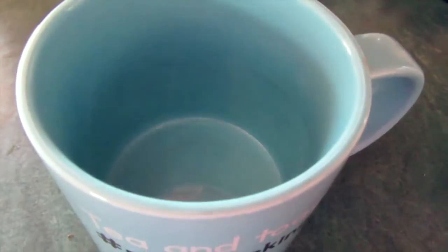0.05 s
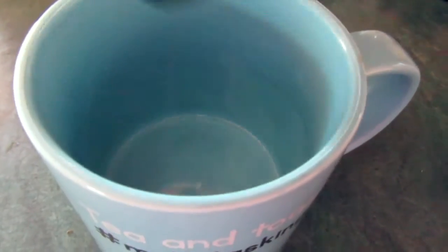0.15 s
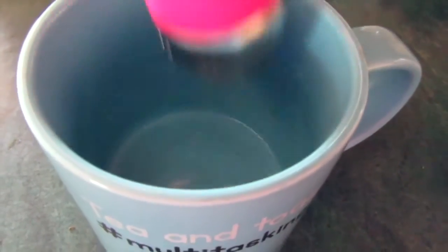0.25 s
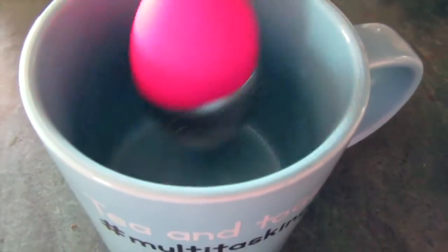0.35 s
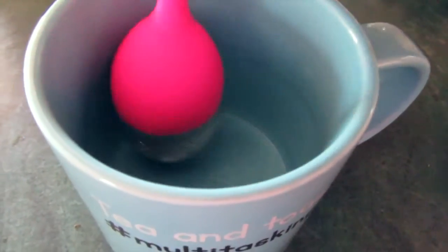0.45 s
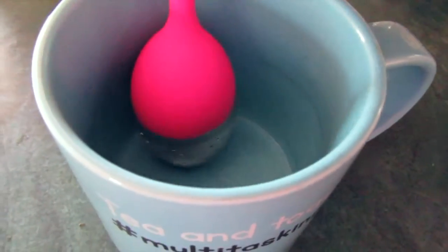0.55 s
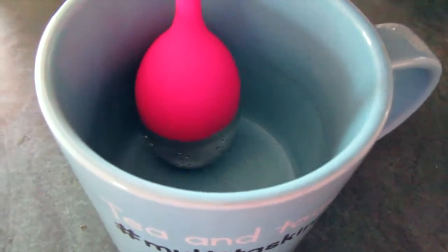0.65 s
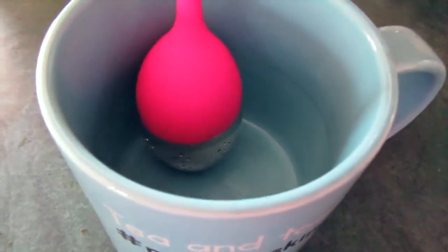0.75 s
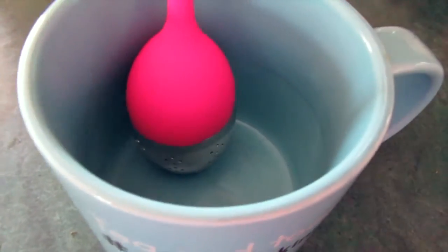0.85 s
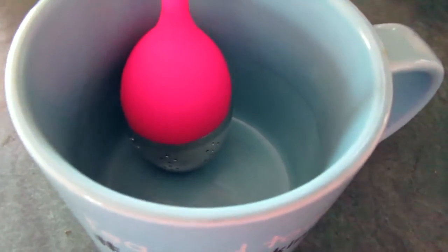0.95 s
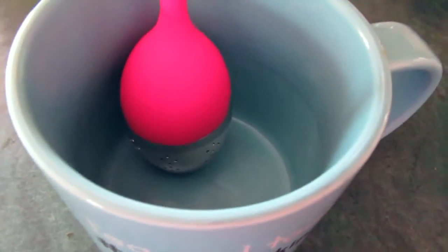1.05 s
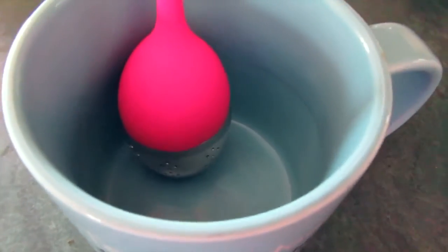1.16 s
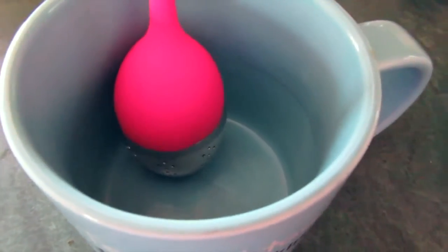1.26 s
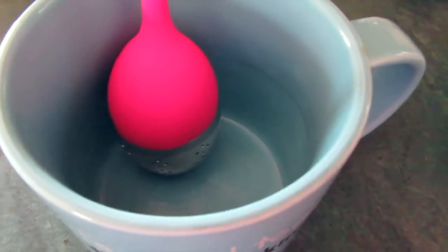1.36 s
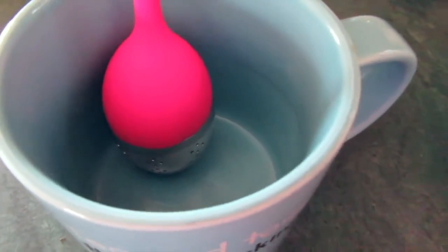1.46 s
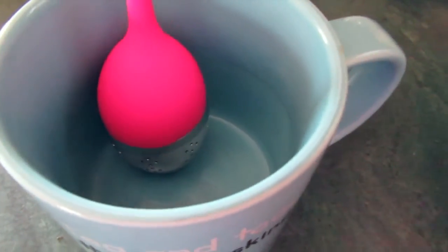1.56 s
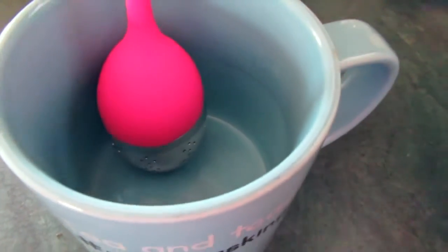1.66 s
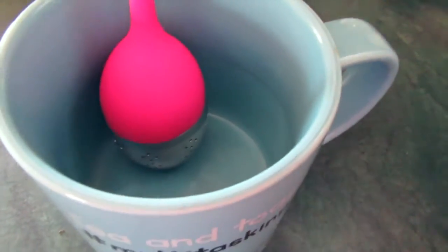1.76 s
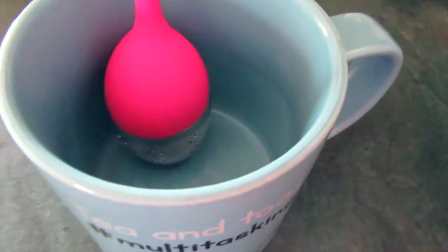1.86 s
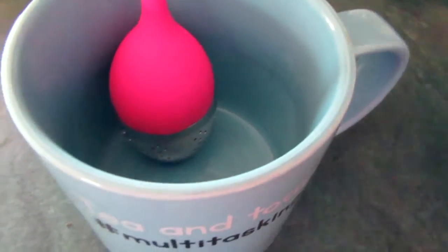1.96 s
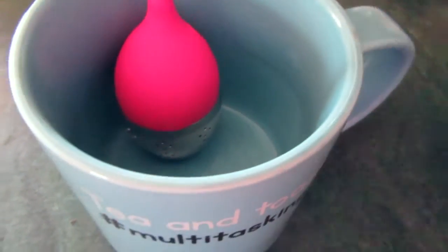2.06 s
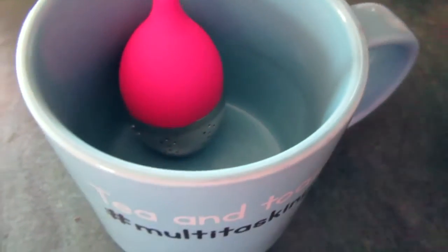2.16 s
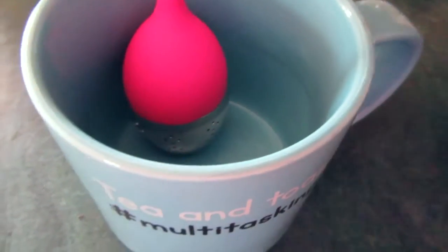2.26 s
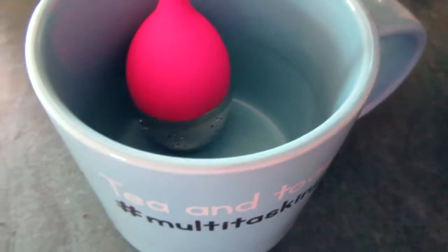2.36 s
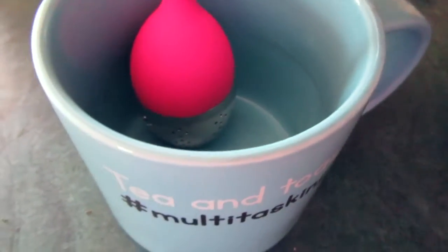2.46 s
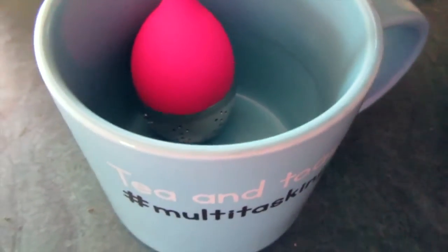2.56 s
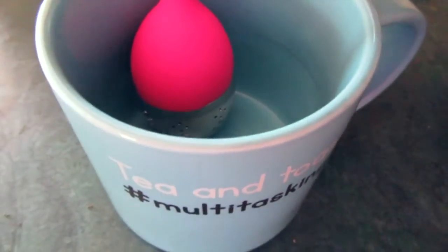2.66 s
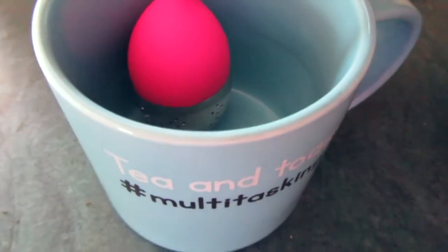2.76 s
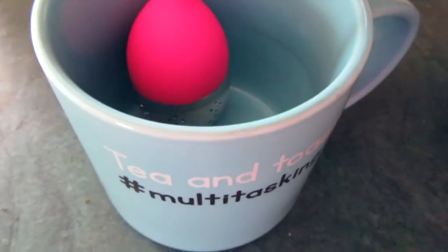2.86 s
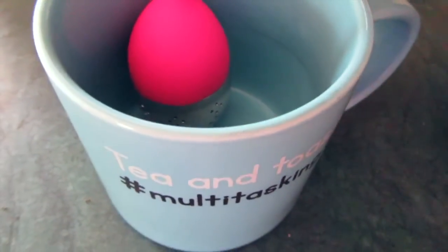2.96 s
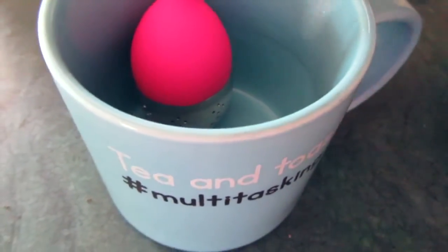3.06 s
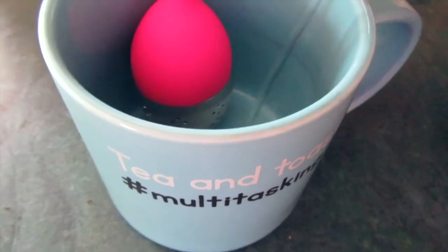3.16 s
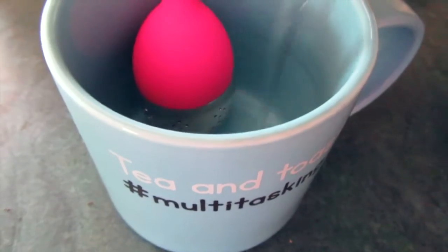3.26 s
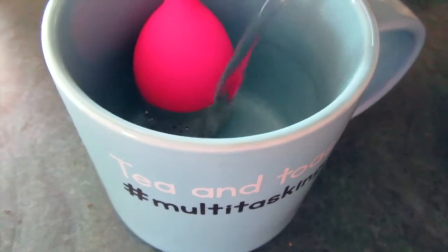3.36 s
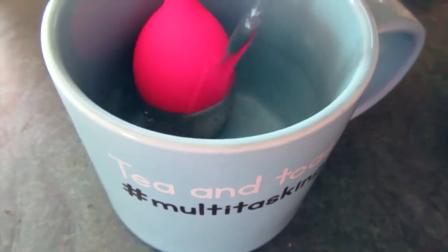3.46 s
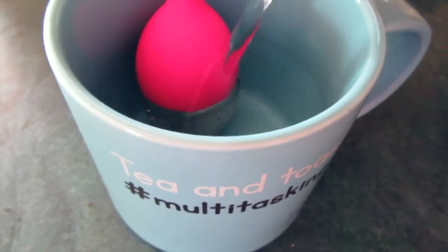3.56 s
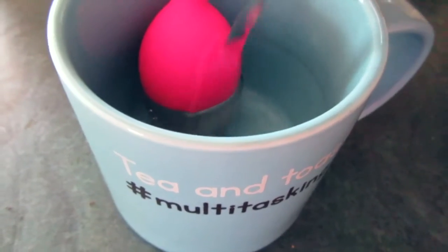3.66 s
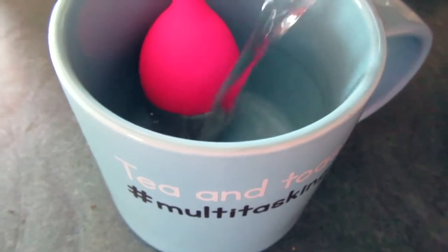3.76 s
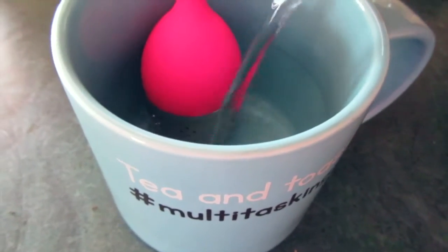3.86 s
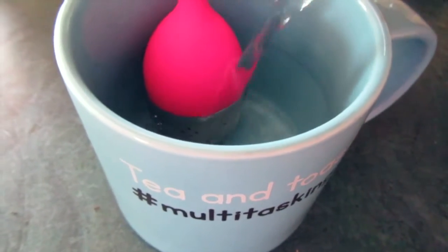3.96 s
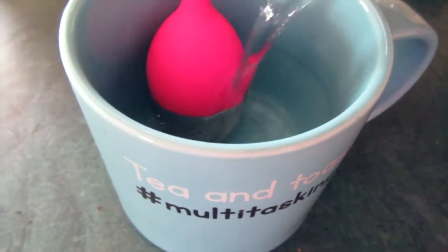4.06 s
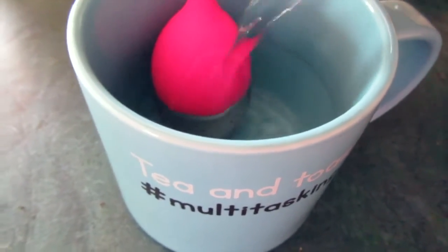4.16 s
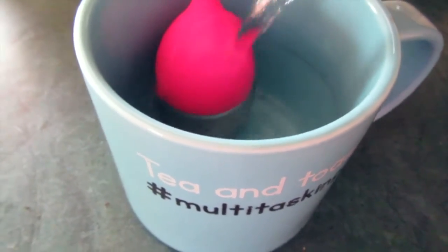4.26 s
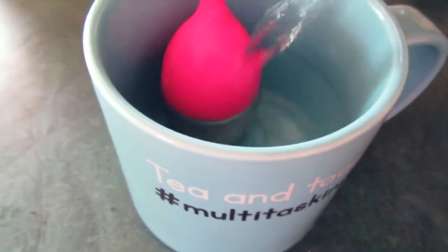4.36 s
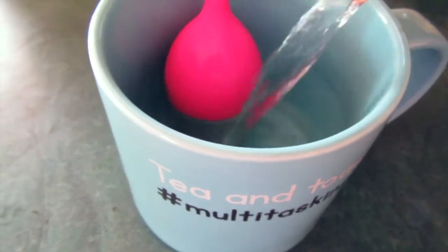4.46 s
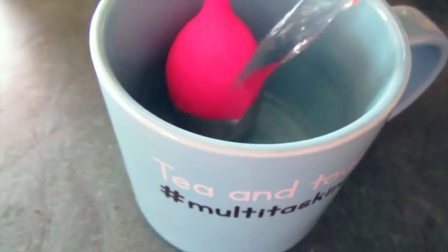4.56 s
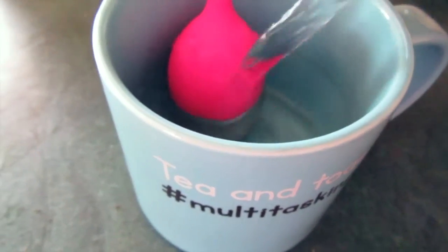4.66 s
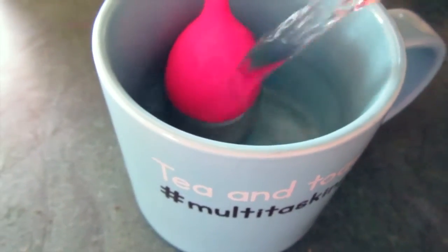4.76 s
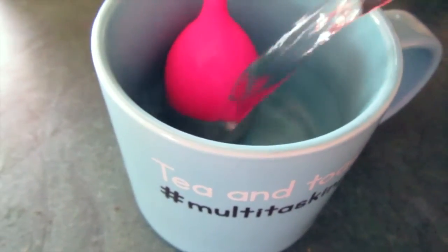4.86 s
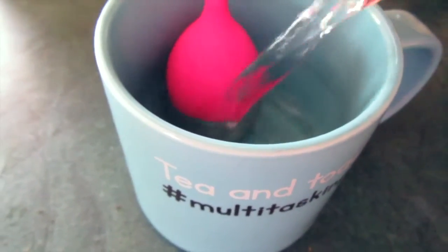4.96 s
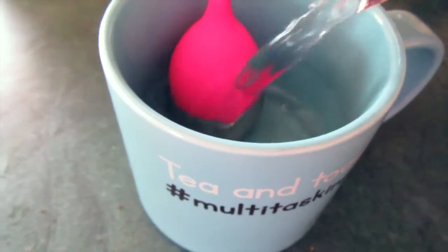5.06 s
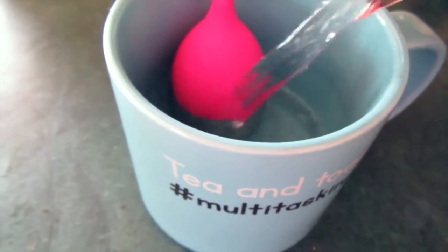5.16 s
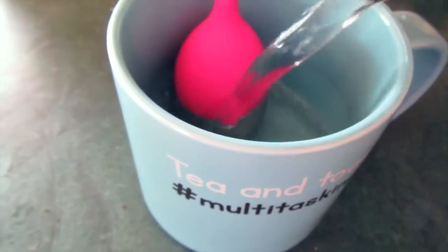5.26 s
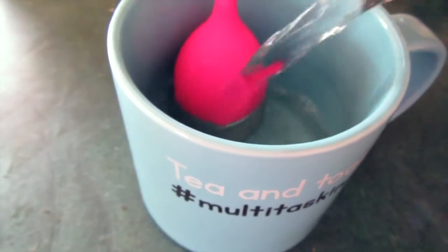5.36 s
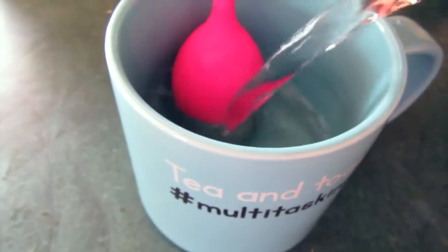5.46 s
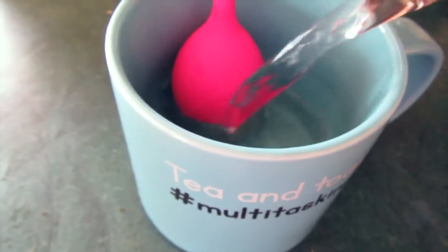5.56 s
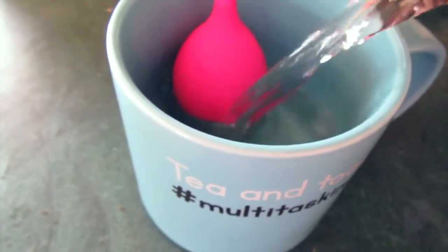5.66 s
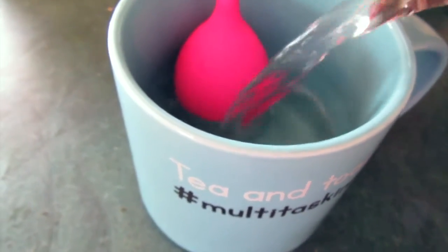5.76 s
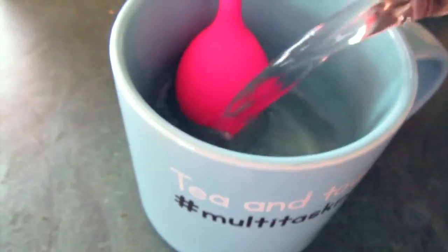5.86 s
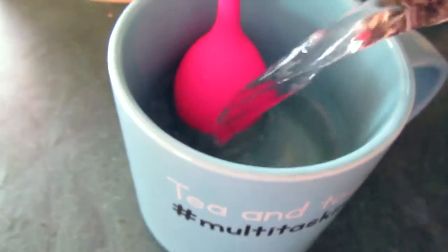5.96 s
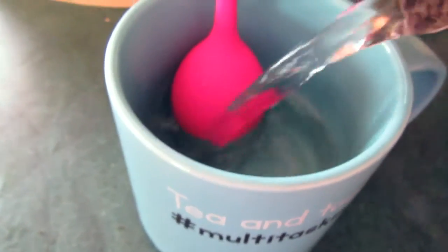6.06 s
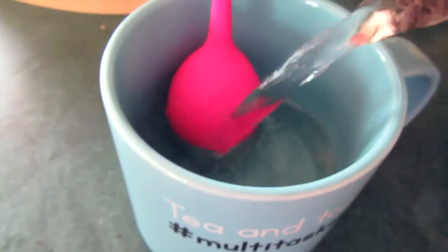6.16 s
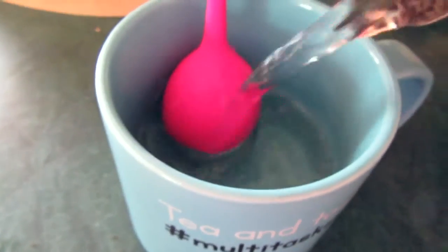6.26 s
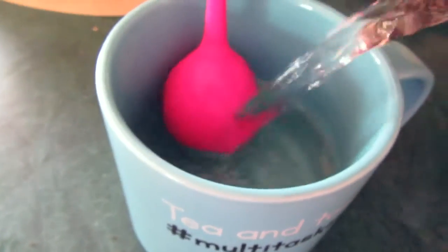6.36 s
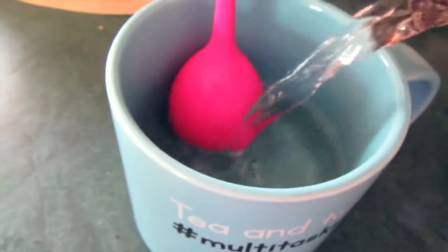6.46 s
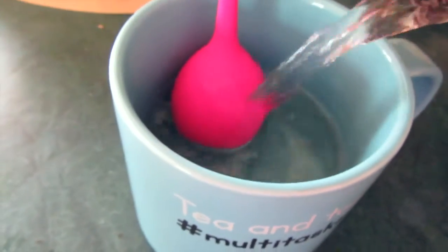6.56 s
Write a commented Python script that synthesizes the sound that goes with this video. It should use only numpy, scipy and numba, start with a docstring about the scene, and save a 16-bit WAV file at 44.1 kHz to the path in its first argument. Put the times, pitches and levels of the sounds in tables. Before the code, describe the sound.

In a quiet kitchen, a tea infuser drops into an empty ceramic mug with a loud, ringing clink and a brief rattle. A little further off, a kettle scrapes, clicks and bumps hollowly as it is lifted. Drips of water then splat into the mug and grow into an uneven, bubbling pour that rises slightly in pitch. The microphone is close above the mug.

```python
"""In a kitchen, a tea infuser drops into an empty ceramic mug, which rings. A kettle is dragged off
its base and bumps. Hot water drips, then pours: drops tick and trap bubbles, which ring like tiny
bells. The air in the mug rings along, and its pitch rises as the mug fills. A phone close above the
mug turns itself down at the first loud clink and slowly lets the kitchen back in."""
import sys
import numpy as np
from scipy import signal
from scipy.fft import rfft, irfft, next_fast_len
from scipy.io import wavfile
from numba import njit

SR = 44100
rng = np.random.default_rng(int(sys.argv[2]) if len(sys.argv) > 2 else 0)


def put_to_file(sound):
    """Save the sound as 16-bit audio at rate SR, in the file named by the first command-line argument."""
    columns = np.atleast_2d(sound).T  # one column per channel
    safe = np.clip(columns, -1, 1)
    whole_steps = np.round(safe * 32767)
    wavfile.write(sys.argv[1], SR, whole_steps.astype(np.int16))


N = 291501
T = np.arange(N) / SR

# the tone of the room's hush: (pitch [Hz], level [dB])
HUSH_SPECTRUM = [(20, -27.5), (35, 1.5), (50, -7.5), (81, -8), (163, -11), (271, -11), (354, -14.5),
                 (600, -15.5), (830, -10), (1000, -18), (1210, -14), (1500, -20.5), (1960, -23),
                 (9520, -31), (15000, -42.5)]
# the notes of the mug wall: (pitch [Hz], level [dB], fade time [s])
# A fade time, or t60, is how long a sound takes to fall by 60 dB.
MUG_NOTES = [(2496, 0, .8), (2734, -4, .67), (4269, -31, .12), (5346, -29, .33), (5560, -33, .4),
             (7000, -21, .17), (7600, -31, .26), (10560, -37, .24), (11750, -32, .18), (12030, -37, .19),
             (13260, -30, .13), (13600, -26, .075)]
# the infuser hits the mug:
# (time [s], wall ring [dB], air thump [dB], thump pitch [Hz], thump fade time [s], crack [dB])
INFUSER_KNOCKS = [(0.2566, 3, 13.5, 895, .02, 9), (0.5886, -28.5, 3.5, 825, 0.031, -24.5)]
# the infuser rattles against the wall: (time [s], level [dB])
INFUSER_RATTLES = [(.479, -13), (0.505, -13.5), (0.539, -26.5), (0.588, -8.5)]
# dry clicks as the kettle is handled: (time [s], level [dB], pitch [Hz])
KETTLE_CLICKS = [(0.961, -32, 3500), (1.889, -30.5, 1050), (1.922, -24, 1410), (1.924, -34.5, 4740),
                 (2.047, -31, 1640), (2.213, -40.5, 7440), (2.559, -26, 2610), (2.564, -19, 2800),
                 (2.581, -25, 4300), (2.753, -32.5, 10500)]
# soft rustles and rumbles: (time [s], level [dB], pitch [Hz], width [octaves], fade time [s])
KETTLE_RUSTLES = [(1.109, -37.5, 5000, 1.3, 0.55), (1.175, -32.5, 6050, 1.2, 0.1),
                  (1.43, -30.5, 160, 0.39, 0.54), (1.82, -36.5, 380, 0.55, 0.97),
                  (2.337, -33.5, 5500, 1.4, 0.36)]
# the kettle's foot slides in short shoves: (time [s], length [s], level [dB])
KETTLE_SHOVES = [(1.11, .1, -52.5), (1.283, 0.021, -34.5), (1.317, 0.062, -35), (1.368, 0.051, -25),
                 (1.423, 0.018, -19.5), (1.433, 0.0088, -16.5), (2.355, 0.053, -49)]
# the tone of the sliding foot: (pitch [Hz], level [dB])
DRAG_SPECTRUM = [(35, -54), (60, -11), (269, -13.5), (339, -3), (591, -15.5), (648, -3), (895, -12.5),
                 (1450, -4), (2010, -14.5), (2360, -11.5), (2840, -18.5), (11100, -35), (15000, -41)]
# the kettle bumps: (time [s], level [dB], rattle [dB])
KETTLE_BUMPS = [(2.306, -10.5, -25), (2.368, -18, -30), (2.449, -30.5, -37.5)]
# the notes of the full kettle: (pitch [Hz], level [dB], fade time [s])
KETTLE_NOTES = [(183, -17, .16), (228, -15, .22), (288, 0, .13), (460, -7, .085), (689, -15, .065),
                (850, -17, .05), (2150, -25, .06)]
# the first drips splat on dry china:
# (time [s], splat [dB], splat pitch [Hz], pitch where the wall rings most [Hz], wall ring [dB])
FIRST_DRIPS = [(3.184, -33, 2300, 8120, -36.5), (3.474, -19, 7000, 6900, -31.5),
               (3.734, -30, 3000, 5460, -60), (3.7395, -10.5, 4900, 5630, -44),
               (3.84, -25.5, 10400, 11300, -45), (3.933, -26.5, 4170, 5500, -57),
               (3.9562, -16, 5900, 5600, -51), (4.129, -31, 4660, 7000, -44), (4.348, -20, 6050, 6950, -33)]
# water traps a big pocket of air: (time [s], level [dB], bubble pitch [Hz])
BIG_BUBBLES = [(3.74, -23, 1310), (3.937, -28.5, 850), (4.235, -28.5, 1000), (4.255, -30, 1010),
               (4.324, -24, 1470), (4.431, -19, 1010), (4.49, -21, 1010), (4.549, -17, 1310),
               (4.561, -21, 1100), (4.63, -23, 1050), (4.639, -18, 1110), (4.703, -18.5, 1210),
               (4.739, -14.5, 1170), (4.768, -19.5, 950), (4.823, -9, 1170), (4.836, -19.5, 1090),
               (4.886, -15, 1430), (4.909, -19.5, 1230), (5.066, -21, 1130), (5.136, -10.5, 1136),
               (5.156, -23.5, 1120), (5.259, -21.5, 1110), (5.461, -15, 1070), (5.467, -18, 1330),
               (5.484, -18.5, 1110), (5.646, -24.5, 1200), (5.709, -17.5, 1280), (5.734, -22.5, 1220),
               (5.748, -16.5, 1350), (5.796, -27, 1120), (5.871, -20, 1180), (5.96, -25.5, 1350),
               (6.011, -22, 1390), (6.028, -25.5, 1330), (6.125, -26, 1220), (6.222, -19.5, 1650),
               (6.313, -23.5, 1500), (6.506, -19.5, 1400), (6.551, -21, 1260)]
# hard drops trap one small bubble each: (time [s], level [dB], bubble pitch [Hz])
SMALL_BUBBLES = [(3.91, -20, 1810), (4.206, -19.5, 5840), (4.2442, -18.5, 3530), (4.2823, -17.5, 4640),
                 (4.3678, -22.5, 3230), (4.3804, -19.5, 3400), (4.4248, -4.5, 3180), (4.4485, -22, 3400),
                 (4.4918, -10.5, 2300), (4.5281, -20, 4330), (4.542, -31, 2400), (4.5707, -22.5, 2400),
                 (4.5996, -17, 5990), (4.6234, -19, 2460), (4.6917, -15, 1790), (4.7307, -16.5, 3740),
                 (4.8516, -32, 3310), (5.1948, -18.5, 3730), (5.324, -22.5, 3620), (5.378, -17, 2480),
                 (5.5596, -24, 3260), (5.5885, -25.5, 3370), (5.8894, -21.5, 2650), (6.0022, -25, 3500),
                 (6.2188, -19, 3340), (6.2462, -29, 2770), (6.3764, -23.5, 4410), (6.4022, -20.5, 3260),
                 (6.4737, -27, 1800)]
# the strength of the stream: (time [s], level [dB])
STREAM_LEVELS = [(4.12, -70.5), (4.3, -45), (4.42, -64), (4.5, -41.5), (4.9, -41), (5.05, -42.5),
                 (5.58, -46), (5.8, -41), (6.15, -47), (6.4, -46), (6.6, -41)]
# the stream surges: (time [s], length [s], extra level [dB])
STREAM_SPURTS = [(4.325, 0.062, 9), (4.84, 0.066, 3), (5.413, 0.085, 9), (5.64, 0.11, 5), (5.863, .06, 0.5),
                 (6.21, 0.093, 5), (6.338, 0.086, 7), (6.561, 0.044, 3.5)]
# the notes of the air in the mug: (starting pitch [Hz], final pitch [Hz], width [Hz], gain [times])
AIR_NOTES = [(1050, 1506, 310, 1.24), (2400, 2780, 47, 1.03), (3257, 3610, 100, 1.87),
             (4340, 4360, 120, 1.22)]

POUR_START_S, POUR_END_S = 4.17, 6.48


def undb(db):
    """Turn decibels into a number to multiply a sound by."""
    return 10 ** (np.asarray(db) / 20)


def add(out, s, x):
    """Mix the sound x into out, starting at s seconds."""
    i = int(s * SR)
    out[i:i + len(x)] += x[:max(N - i, 0)]


def fade(t60):
    """A curve that dies away by 60 dB every t60 seconds."""
    return 1000 ** (-T[:int(1.5 * t60 * SR) + 2] / t60)


def ring(hz, t60, glide=0):
    """A pure note that starts fast and fades; glide=0.05 lifts its pitch by 5% over t60."""
    decay = fade(t60)
    t = T[:len(decay)]
    onset = 1 - np.exp(-2 * hz * t)
    return decay * onset * np.sin(2 * np.pi * hz * t * (1 + glide * t / t60 / 2))


def colour(x, spectrum):
    """Give x the tone of a (pitch, level) table, at an average strength of 1."""
    hz, db = np.transpose(spectrum)
    size = next_fast_len(len(x), real=True)
    pitches = np.arange(size // 2 + 1) * SR / size + 1
    gains = undb(np.interp(np.log(pitches), np.log(hz), db))
    shaped = irfft(rfft(x, size) * gains, size)[:len(x)]
    return shaped / np.sqrt(np.mean(shaped ** 2))


def burst(hz, octaves, t60):
    """A fading puff of noise around the pitch hz, with a peak of 1."""
    decay, size = fade(t60), 8192
    distance = np.log2((np.arange(size // 2 + 1) * SR / size + 1) / hz) / octaves
    noise = irfft(rfft(rng.standard_normal(size)) / (1 + distance ** 2 / 2) ** 2)
    puff = np.resize(noise, len(decay)) * decay
    return puff / np.abs(puff).max()


@njit
def bandpass(x, hz, width_hz):
    """Let through only the part of x near the moving pitch hz."""
    out, band, low = np.empty(len(x)), 0., 0.
    for i in range(len(x)):
        step, damping = np.tan(np.pi * hz[i] / SR), width_hz / hz[i]
        swing = (band + step * (x[i] + 1e-18 - low)) / (1 + step * (step + damping))
        band, low = 2 * swing - band, low + 2 * step * swing
        out[i] = damping * swing
    return out


def kitchen(hum_hz=88.6, hum_end_s=2.3):
    """The room's steady hush, and a low hum that dies away early on."""
    hush = colour(rng.standard_normal(N), HUSH_SPECTRUM)
    hum = np.sqrt(2) * np.sin(2 * np.pi * hum_hz * T) * np.clip(2 * (hum_end_s - T), 0, 1)
    return undb(-50) * hush + undb(-54.5) * hum


def infuser(lean_s=0.463, lean_length_s=0.013, lean_db=-10):
    """Each knock rings the wall, thumps the air in the mug and makes a sharp crack."""
    out = np.zeros(N)
    for s, wall_db, thump_db, thump_hz, thump_t60, crack_db in INFUSER_KNOCKS:
        for k, (hz, db, t60) in enumerate(MUG_NOTES):
            note = undb(wall_db + db) * ring(hz, t60)
            if k == 0:  # the infuser leans on the wall and muffles the lowest note
                leaning = np.clip((s + T[:len(note)] - lean_s) / lean_length_s, 0, 1)
                note *= undb(lean_db * leaning)
            add(out, s, note)
        add(out, s, undb(thump_db) * ring(thump_hz, thump_t60))
        add(out, s, undb(thump_db - 33.5) * burst(hz=467, octaves=0.096, t60=0.28))  # worktop answers
        add(out, s, undb(crack_db) * burst(hz=3000, octaves=0.67, t60=0.0035))
        add(out, s, undb(crack_db - 29.5) * burst(hz=3500, octaves=1.1, t60=0.15))  # mesh buzzes
    return out


def rattles(settle_s=0.507, rim_top_hz=2300):
    """The infuser chatters against the wall, and its weight lands on the bottom with a thud."""
    out = np.zeros(N)
    for s, db in INFUSER_RATTLES:
        add(out, s, undb(db) * burst(hz=1380, octaves=0.47, t60=0.011))
    add(out, settle_s, undb(-19) * burst(hz=460, octaves=0.5, t60=0.13))
    out = signal.sosfilt(signal.butter(4, rim_top_hz, fs=SR, output="sos"), out)  # soft rim dulls it
    for s, db in INFUSER_RATTLES:
        add(out, s, undb(db - 23.5) * burst(hz=7000, octaves=0.8, t60=0.093))  # mesh scrapes faintly
    return out


def handling(rustle_rise_s=0.014):
    """Handling the kettle makes dry clicks and soft rustles."""
    out = np.zeros(N)
    for s, db, hz in KETTLE_CLICKS:
        add(out, s, undb(db) * burst(hz, octaves=0.65, t60=0.019))
    for s, db, hz, octaves, t60 in KETTLE_RUSTLES:
        rustle = burst(hz, octaves, t60)
        add(out, s, undb(db) * rustle * np.minimum(T[:len(rustle)] / rustle_rise_s, 1))
    return out


def drag(slips_per_s=1800, rise_s=0.0048, t60=0.065):
    """The kettle's foot moves in many tiny slips; each shove grips, holds and dies away."""
    slips = rng.standard_normal(N) * (rng.random(N) < slips_per_s / SR)
    hiss = 0.13 * rng.standard_normal(N)
    push = np.zeros(N)
    for s, length, db in KETTLE_SHOVES:
        release_db = -60 * np.maximum(T - s - length, 0) / t60
        push = np.maximum(push, np.clip((T - s) / rise_s, 0, 1) * undb(db + release_db))
    return colour(slips + hiss, DRAG_SPECTRUM) * push


def bumps():
    """The kettle bumps with a hollow ring, a dull thud from the worktop and a rattle on top."""
    out = np.zeros(N)
    for s, bump_db, rattle_db in KETTLE_BUMPS:
        for hz, db, t60 in KETTLE_NOTES:
            add(out, s, undb(bump_db + db) * ring(hz, t60))
        add(out, s, undb(bump_db - 8) * burst(hz=380, octaves=1.0, t60=0.089))
        add(out, s, undb(rattle_db) * burst(hz=1280, octaves=2.8, t60=0.044))
    return out


def drips():
    """Each drip splats, fizzes briefly and wakes the wall notes near one pitch."""
    out = np.zeros(N)
    for s, splat_db, splat_hz, wall_hz, wall_db in FIRST_DRIPS:
        add(out, s, undb(splat_db) * burst(splat_hz, octaves=0.58, t60=0.012))
        add(out, s, undb(splat_db - 22) * burst(hz=7000, octaves=0.27, t60=0.15))
        for hz, _, t60 in MUG_NOTES:
            nearness = 1 / (1 + (np.log2(hz / wall_hz) / 0.11) ** 2)
            add(out, s, undb(wall_db) * nearness * ring(hz, 0.52 * t60))  # the wet spot cuts it short
    return out


def pool(t, start_s=4.69, spread_s=0.49):
    """How much of the mug's bottom is under water at time t, from 0 to 1."""
    return np.clip((t - start_s) / spread_s, 0, 1)


def add_splash(out, s, tick_db, slap_db):
    """Water lands with a tick, softer once there is a pool, and the surface slaps shut."""
    add(out, s, undb(tick_db - 12 * pool(s)) * burst(hz=7000, octaves=0.67, t60=0.022))
    add(out, s, undb(slap_db) * burst(hz=1350, octaves=1.0, t60=0.024))


def gulps(big_cycles=7.97, small_cycles=14.5):
    """A splash traps a big bubble, which sheds a small one of random pitch."""
    out = np.zeros(N)
    for (s, db, hz), chance in zip(BIG_BUBBLES, rng.standard_normal(len(BIG_BUBBLES))):
        add_splash(out, s, tick_db=db + 0.5, slap_db=db - 4)
        add(out, s, undb(db + 7.5) * ring(hz, big_cycles / hz, glide=0.043))
        small_hz = 2900 * 2 ** (0.35 * chance)
        add(out, s, undb(db - 5) * ring(small_hz, small_cycles / small_hz, glide=0.044))
    return out


def plinks(cycles=14.5):
    """A drop lands hard and traps one small, bright bubble."""
    out = np.zeros(N)
    for s, db, hz in SMALL_BUBBLES:
        tick_db = db - 1.5 + 1.5 * np.log2(hz / 4020)  # finer drops tick harder
        add_splash(out, s, tick_db, slap_db=db - 9.5)
        add(out, s, undb(db + 8.5) * ring(hz, cycles / hz, glide=0.062))
    return out


def rising_pitch(start_hz, end_hz, slosh=0.031):
    """A pitch that climbs as the water rises and wavers as the surface sloshes."""
    waves = signal.resample(rng.standard_normal(N // 1500), N)
    climb = np.clip((T - POUR_START_S) / (POUR_END_S - POUR_START_S), 0, 1) ** 1.8
    return (start_hz + (end_hz - start_hz) * climb) * (1 + slosh * waves)


def bubbles(hz, per_s, octaves, cycles, scatter_db):
    """While the stream runs, random bubbles ring around the pitches hz; average strength 1."""
    out, count = np.zeros(N), int(per_s * N / SR)
    flowing = T > STREAM_LEVELS[0][0]
    for when, (pitch, life, loudness) in zip(rng.random(count), rng.standard_normal((count, 3))):
        i = int(when * N)
        if flowing[i]:
            bubble_hz = min(hz[i] * 2 ** (octaves * pitch), SR / 3)
            t60 = cycles * undb(3 * life) / bubble_hz
            add(out, T[i], undb(scatter_db * min(loudness, 1.7)) * ring(bubble_hz, t60, glide=0.05))
    return out / np.std(out[flowing])


def stream(flutter_db=3, glug_from_s=4.86):
    """Swarms of bubbles follow the flow; the pool cushions it, giving more gurgle and less spray."""
    flutter = signal.resample(rng.standard_normal(N // 1000), N)  # the stream breaks up unevenly
    flow_db = np.interp(T, *np.transpose(STREAM_LEVELS), left=-120) + flutter_db * flutter
    surge_db = sum(db * np.exp(-(2 * (T - s) / length - 1) ** 4) for s, length, db in STREAM_SPURTS)
    depth = np.clip(T - glug_from_s, 0, 1)  # deeper water lets the largest bubbles form
    glug = undb(flow_db - 6.5 + surge_db) * depth
    gurgle = undb(flow_db - 5 + 0.79 * surge_db + 5 * pool(T))
    patter = undb(flow_db + 1 + surge_db)
    spray = undb(flow_db + 3.5 + 1.33 * surge_db - 7.5 * pool(T))
    return (
        glug * bubbles(np.full(N, 490), per_s=120, octaves=0.31, cycles=12, scatter_db=3)
        + gurgle * bubbles(rising_pitch(1294, 1500), per_s=550, octaves=0.41, cycles=4.4, scatter_db=8)
        + patter * bubbles(np.full(N, 2900), per_s=750, octaves=0.53, cycles=9.3, scatter_db=10)
        + spray * bubbles(np.full(N, 8900), per_s=1000, octaves=0.48, cycles=10.4, scatter_db=13.5))


def wall_ring(splashes):
    """Splashes ring the wall, mostly its high notes, less and less as the water covers it."""
    response = np.zeros(N)
    for hz, db, t60 in MUG_NOTES:
        add(response, 0, undb(db / 2) * (hz / MUG_NOTES[0][0]) ** 2 * ring(hz, 0.9 * t60))
    bare = np.clip((POUR_END_S - T) / (POUR_END_S - POUR_START_S), 0, 1)
    return signal.fftconvolve(splashes * bare, response[:SR] / np.linalg.norm(response))[:N]


def water():
    """Single drops and the stream make the air in the mug and its wall ring along."""
    splashes = gulps() + plinks() + stream()
    air = sum(gain * bandpass(splashes, rising_pitch(start_hz, end_hz), float(width_hz))
              for start_hz, end_hz, width_hz, gain in AIR_NOTES)
    return 0.49 * splashes + air + undb(-19.5) * wall_ring(splashes)


def room(x, echo_db, low_t60=0.61, high_t60=0.15):
    """Add the kitchen's wash of echoes, in which the high sounds die first."""
    noise, t = rng.standard_normal(SR), T[:SR]
    low = signal.sosfilt(signal.butter(2, 1800, fs=SR, output="sos"), noise)
    tail = low * undb(-60 * t / low_t60) + 1.2 * noise * undb(-60 * t / high_t60)
    tail *= t > 0.005  # the first echo takes a moment to arrive
    return x + undb(echo_db) * signal.fftconvolve(x, tail / np.linalg.norm(tail))[:N]


def scene():
    """The mug is close to the microphone, the kettle further off."""
    near = room(infuser() + rattles(), echo_db=-25) + room(water() + drips(), echo_db=-20)
    far = room(handling() + drag(), echo_db=-17.5) + room(bumps(), echo_db=-23.5, low_t60=0.46)
    return (near + far + kitchen())[None]


@njit
def follow_peaks(x, rise_s, fall_s):
    """Track how loud x is, quick to rise and slow to fall."""
    out, level = np.empty(len(x)), 0.
    for i in range(len(x)):
        lag_s = rise_s if abs(x[i]) > level else fall_s
        level += (abs(x[i]) - level) / (SR * lag_s)
        out[i] = level
    return out


def record(dry):
    """The phone turns down on loud peaks, clips what slips past and cuts the very highest sounds."""
    level = follow_peaks(dry[0], rise_s=0.00031, fall_s=0.68)
    gain = np.minimum(1, 0.69 / (level + 1e-9))
    treble_cut = signal.ellip(8, 0.2, 70, 15300, fs=SR, output="sos")
    return signal.sosfilt(treble_cut, np.clip(dry * gain, -1, 1))


dry = scene()
out = record(dry)
put_to_file(out)
```